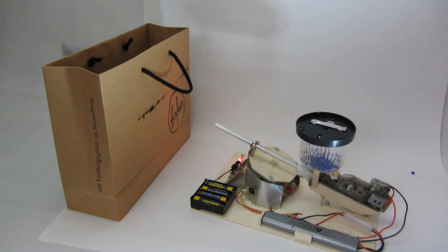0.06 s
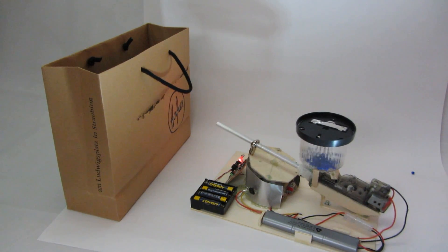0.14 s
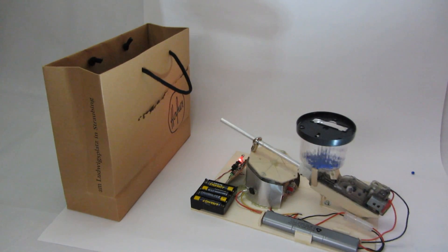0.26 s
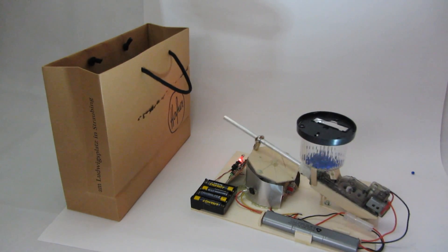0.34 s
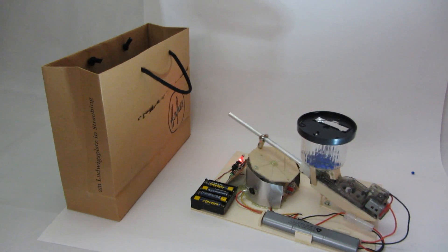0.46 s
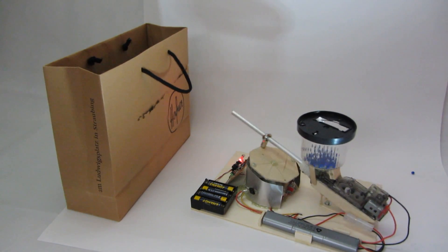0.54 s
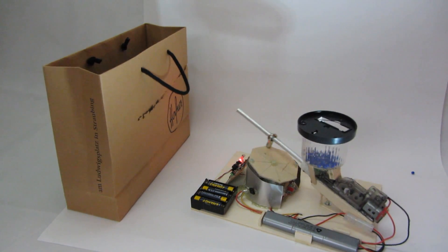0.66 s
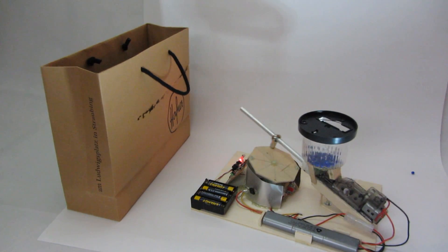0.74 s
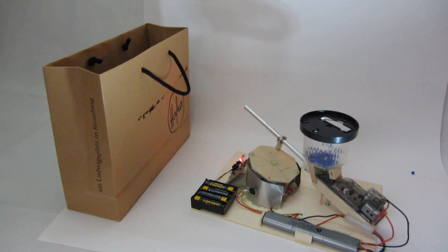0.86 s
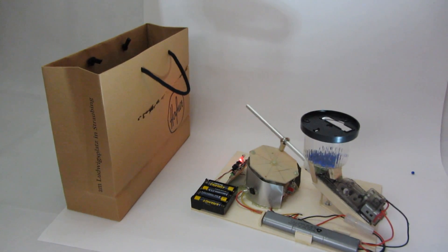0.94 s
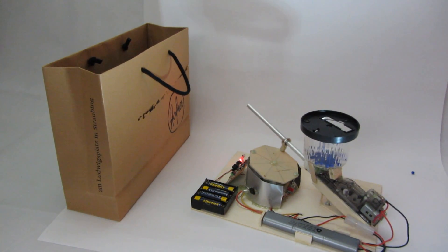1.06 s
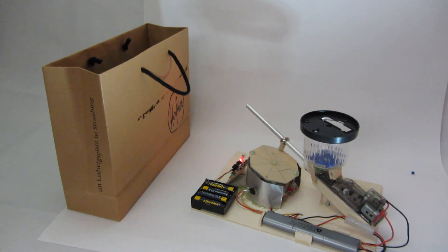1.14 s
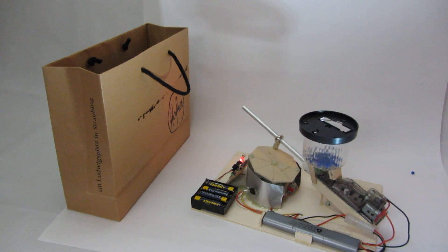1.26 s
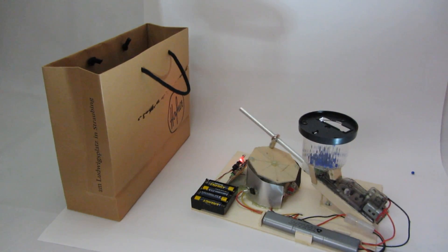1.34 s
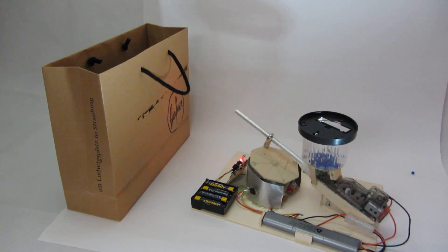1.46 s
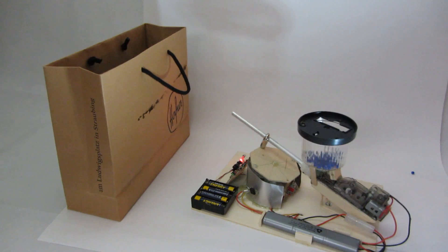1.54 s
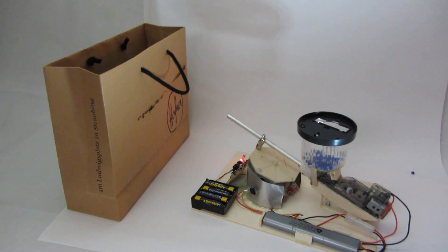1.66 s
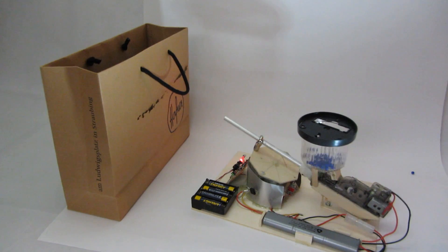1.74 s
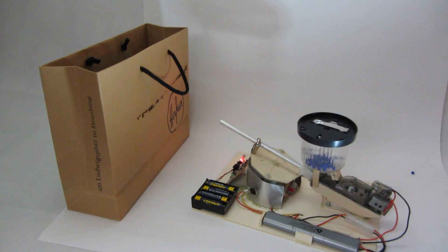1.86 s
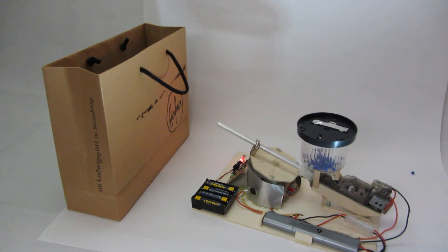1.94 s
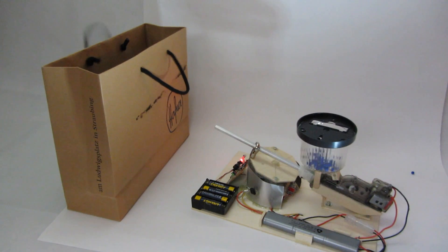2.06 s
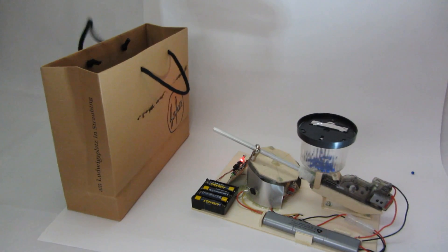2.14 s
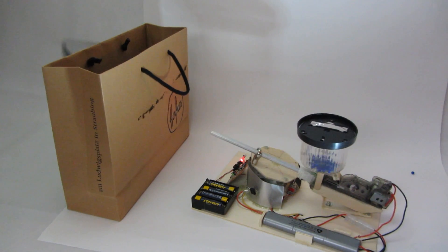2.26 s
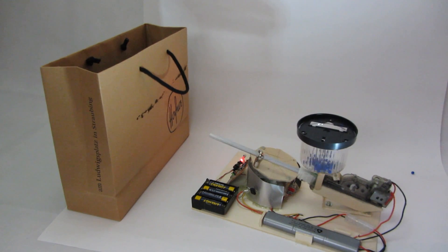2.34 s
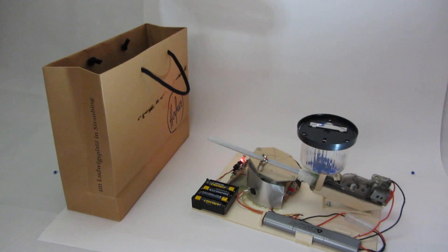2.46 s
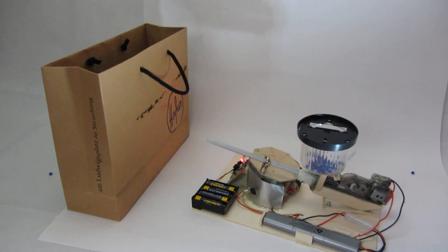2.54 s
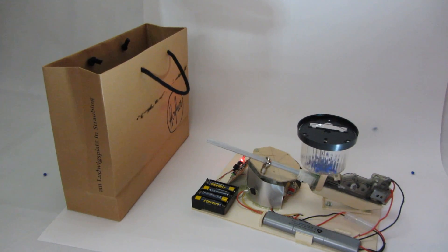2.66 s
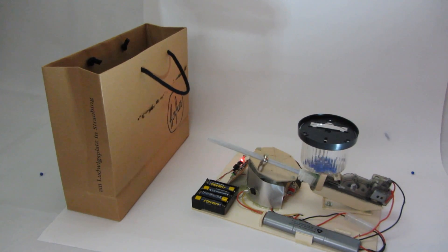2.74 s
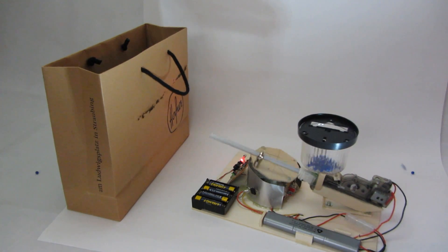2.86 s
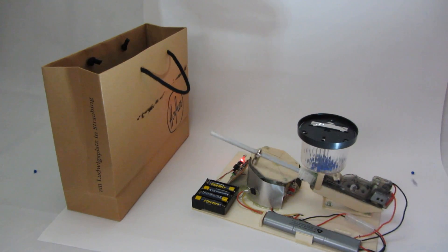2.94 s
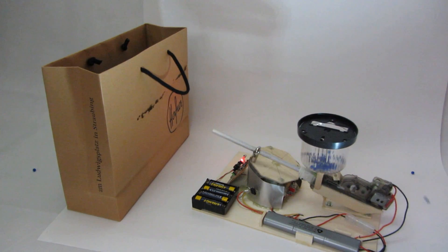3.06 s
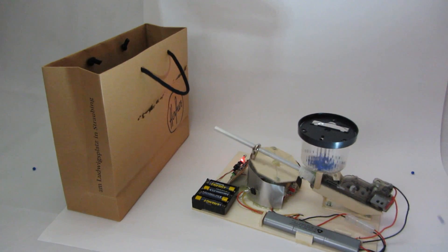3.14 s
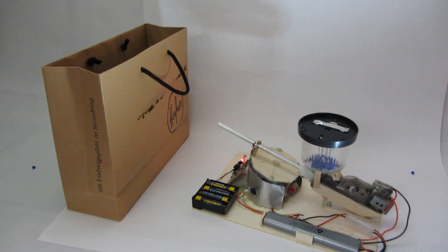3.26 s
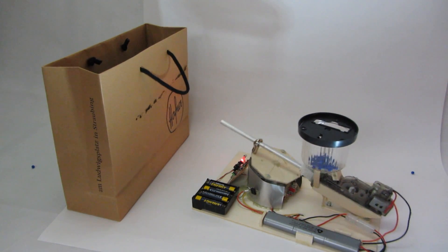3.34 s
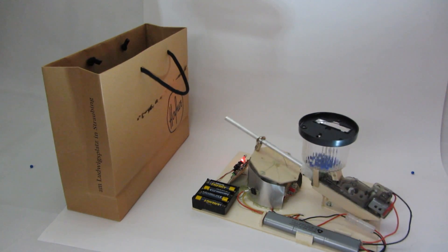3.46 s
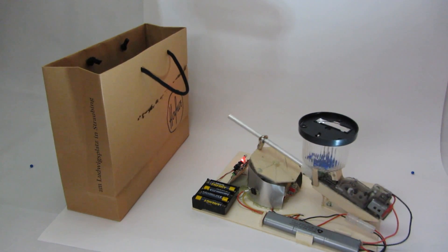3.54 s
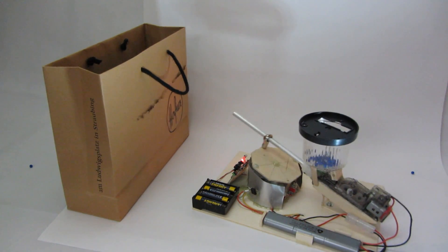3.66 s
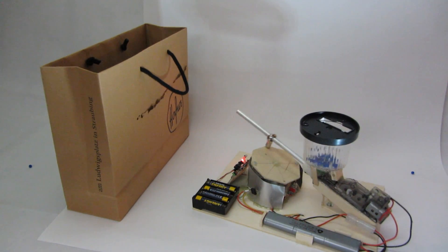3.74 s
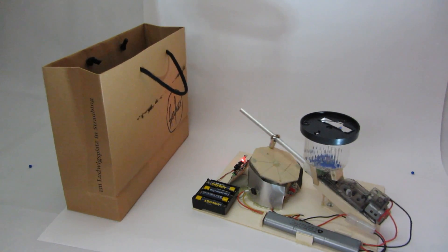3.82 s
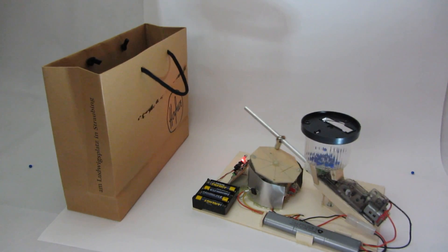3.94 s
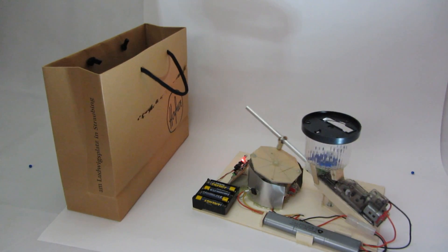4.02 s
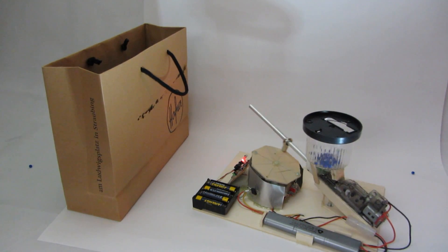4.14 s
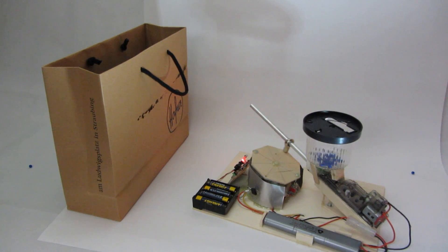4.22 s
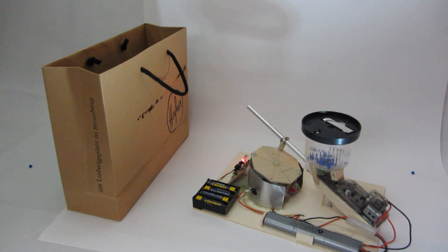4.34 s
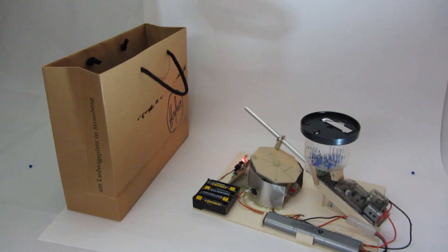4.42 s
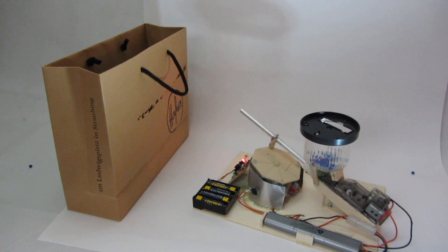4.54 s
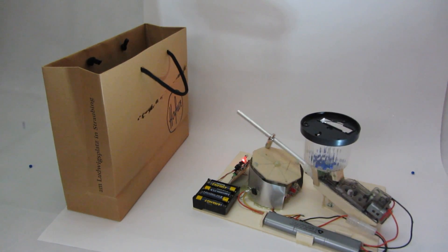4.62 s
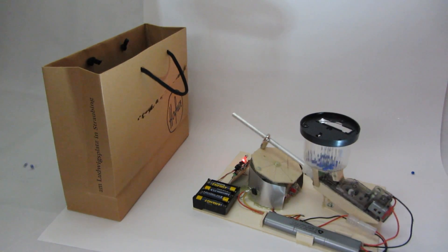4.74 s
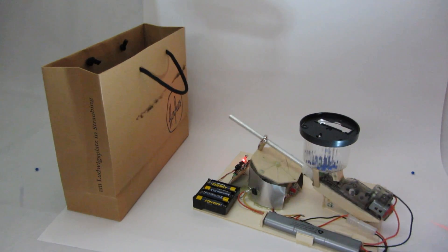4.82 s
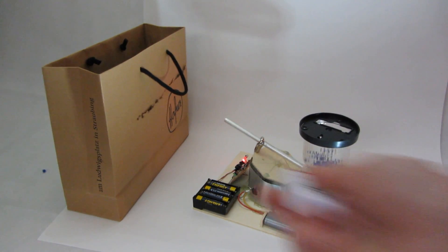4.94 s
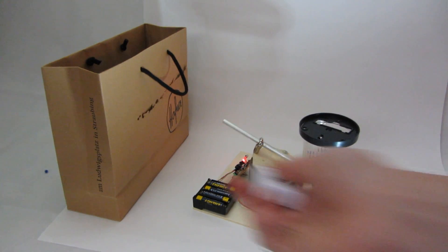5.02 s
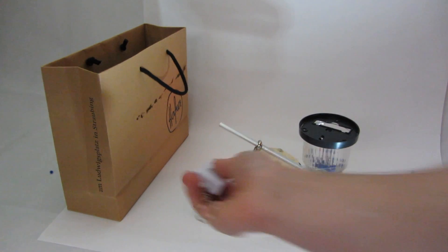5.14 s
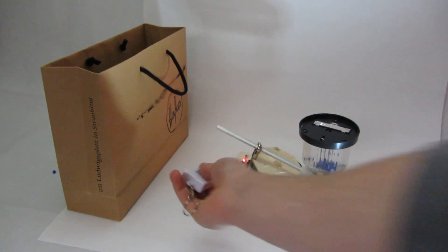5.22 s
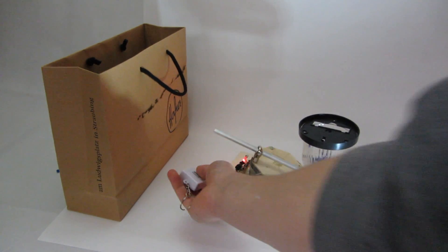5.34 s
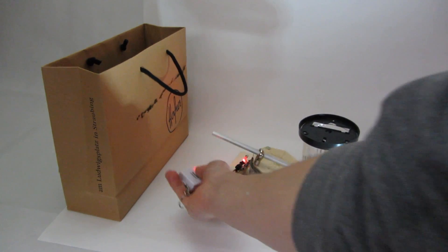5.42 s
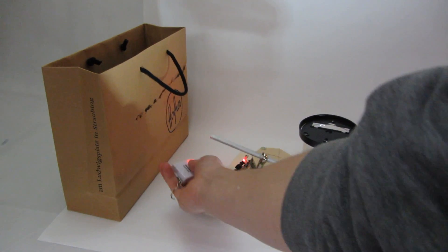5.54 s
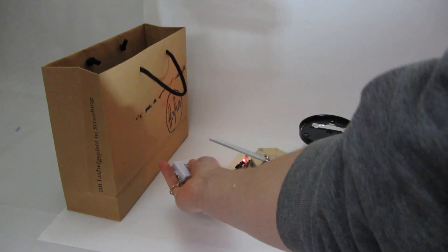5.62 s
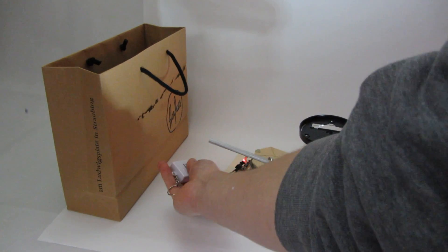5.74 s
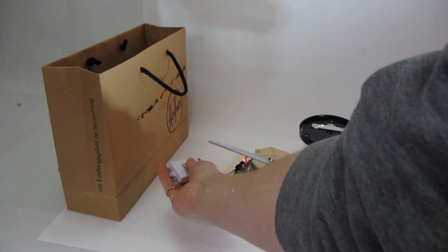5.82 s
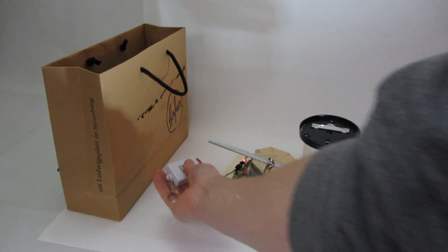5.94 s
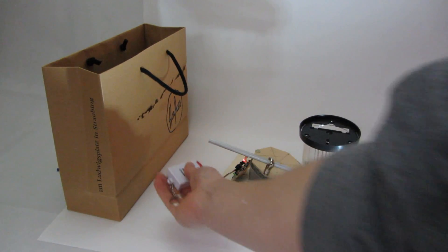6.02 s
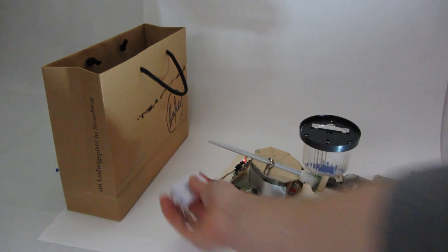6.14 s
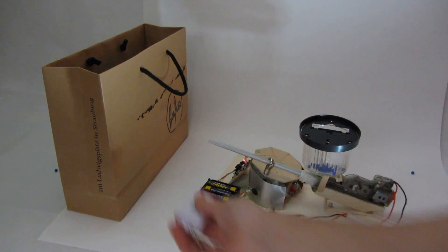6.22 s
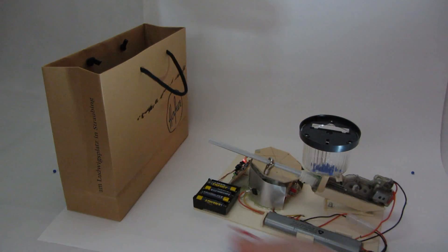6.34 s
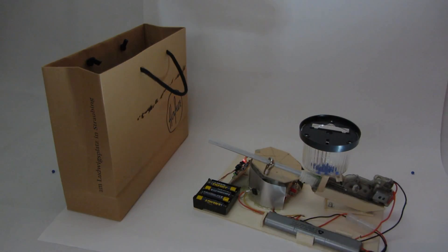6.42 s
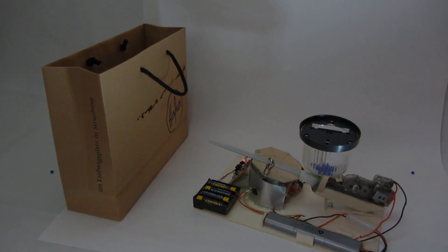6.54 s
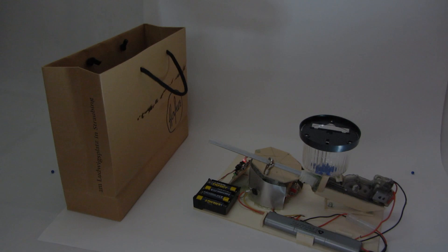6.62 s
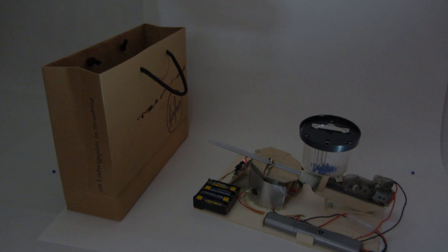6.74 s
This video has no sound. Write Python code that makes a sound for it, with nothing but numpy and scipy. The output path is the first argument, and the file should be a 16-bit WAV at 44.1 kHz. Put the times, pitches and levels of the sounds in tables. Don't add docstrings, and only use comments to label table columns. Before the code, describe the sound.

A small homemade electric pellet gun clatters on automatic at eight hard clacks a second, then stops, leaving ticking plastic pellets and a faint rustle.

```python
import sys
import numpy as np
from scipy import signal
from scipy.io import wavfile

SR = 44100
rng = np.random.default_rng(int(sys.argv[2]) if len(sys.argv) > 2 else 0)


def undo_db(level):
    steps = np.asarray(level, float) / 20
    return 10 ** steps


def file_out(sig):
    cols = np.atleast_2d(sig).T
    lim = np.clip(cols, -1, 1)
    pcm = np.round(lim * 32767).astype(np.int16)
    wavfile.write(sys.argv[1], SR, pcm)


N = 298998
MOTOR_OFF_S, GEARS_STOP_DB_PER_S = 5.723, 162


def in_time(s):
    return np.maximum(np.arange(N) / SR - s, 0)


def clicks(times, db):
    out = np.full(N, 1e-18)
    places = np.round(np.asarray(times) * SR).astype(int)
    np.add.at(out, np.clip(places, 0, N - 1), undo_db(np.asarray(db)))
    return out


def swell(train, rise_s, fall_s):
    rise, fall = np.exp(-1 / (rise_s * SR)), np.exp(-1 / (fall_s * SR))
    return signal.lfilter([1 - rise], np.convolve([1, -rise], [1, -fall]), train)


def grit(spread_db, apart):
    sizes = undo_db(spread_db * np.minimum(rng.exponential(1, N), 5))
    shared, *own = rng.standard_normal((3, N)) * sizes
    out = signal.lfilter([.6, .3], [1], shared) + apart * signal.lfilter([1, -.35], [1], own)
    return out / out.std()


def body(force, modes):
    out, power = 0, 0
    for k, (hz, width_hz, db) in enumerate(modes):
        r = np.exp(-np.pi * width_hz / SR)
        poles = [1, -2 * r * np.cos(2 * np.pi * hz / SR), r * r]
        unit_peak = (1 - r * r) / 2
        out = out + (-1) ** k * undo_db(db) * unit_peak * signal.lfilter([1, 0, -1], poles, force)
        power += undo_db(db) ** 2 * unit_peak
    return out / np.sqrt(power)


def pings(rows, level_db, cycles, rise, spread):
    out = np.zeros((2, N))
    for (s, db, hz), (phase, apart) in zip(rows, rng.uniform(-0.95, 1, (len(rows), 2))):
        turn = np.arange(int(6 * cycles * SR / hz)) * hz / SR
        shape = (1 - np.exp(-turn / rise)) * np.exp(-turn / cycles)
        start = round((s - 1.5 * rise / hz) * SR)
        angle = 2 * np.pi * turn + np.pi * phase + spread * apart * np.array([[1], [-1]])
        out[:, start:start + len(turn)] += undo_db(db + level_db) * shape / shape.max() * np.sin(angle)
    return out


def side_gain(pan_db):
    return undo_db(np.array([[.5], [-.5]]) * pan_db)


def dulled(x):
    return signal.lfilter(*signal.butter(2, 12500, fs=SR), x)


# latch t/s, click
# level/dB, slam level/dB, shudder level/dB
GEAR_TURNS = [(0.001, -6, -12.5, -13.5), (0.1262, -5.5, -8, -16), (0.2506, -7.5, -9, -12.5),
              (0.3758, -6, -8.5, -13), (0.502, -5, -8, -15), (0.627, -7.5, -12, -13),
              (0.7538, -7, -6, -22.5), (0.8783, -6, -7, -19.5), (1.0043, -5.5, -14, -15.5),
              (1.1338, -7, -8.5, -19.5), (1.2609, -7, -9, -20), (1.3864, -7, -6.5, -13),
              (1.5108, -4, -6.5, -17), (1.6345, -6, -15.5, -12), (1.7601, -8, -10.5, -11),
              (1.8872, -7, -7.5, -11.5), (2.0132, -7.5, -18.5, -14.5), (2.1369, -7, -12, -21),
              (2.2638, -8, -8.5, -29), (2.3887, -8.5, -10.5, -27), (2.5122, -8.5, -13, -17),
              (2.6387, -8.5, -9.5, -17.5), (2.762, -7.5, -16.5, -20),
              (2.8835, -8.5, -9.5, -21.5),
              (3.0091, -8, -9.5, -17), (3.1347, -7.5, -8.5, -18), (3.2613, -6.5, -5.5, -14.5),
                           (3.387, -5, -7, -16), (3.514, -6.5, -13.5, -15.5), (3.6416, -5.5, -5.5, -18.5),
                           (3.767, -7, -9, -14.5), (3.8927, -6.5, -6, -14.5), (4.017, -5.5, -8, -15),
                           (4.1424, -5.5, -12, -14), (4.2705, -7, -6.5, -18), (4.3973, -5, -10, -17),
                           (4.522, -5, -8, -18), (4.6472, -5, -11.5, -15), (4.7726, -7, -5.5, -15),
                           (4.8976, -7, -8.5, -24.5), (5.023, -8.5, -9, -16), (5.1502, -8, -10.5, -12.5),
                           (5.275, -8.5, -8, -18), (5.399, -8.5, -12, -19), (5.5243, -9.5, -11.5, -16),
                           (5.6496, -8, -13.5, -16.5)]


def turns():
    return np.transpose(GEAR_TURNS)


# f/Hz, width/Hz, level/dB
SLIP_MODES = [(1400, 300, -9), (2300, 600, -6), (3150, 550, 0), (5500, 1500, -14), (8000, 3000, -17),
              (14000, 4000, -29)]
# f/Hz, width/Hz, level/dB
SLAM_MODES = [(330, 380, -2.5), (900, 210, -4), (1270, 990, -1), (2080, 750, 1), (3006, 280, 3.5),
              (3410, 58, 5.5), (4200, 360, -1), (6080, 1840, -1), (8000, 1800, -0.5), (9350, 5300, -12),
              (14800, 3600, -22)]
# t/s, level/dB
PISTON_SLIPS = [(0.021, -12), (0.1456, -12.5), (0.2713, -16.5), (0.3965, -16.5), (0.5215, -15),
                (0.6487, -9.5), (0.773, -16.5), (0.8986, -14), (1.0235, -14.5), (1.1532, -11),
                (1.2816, -14.5), (1.404, -16.5), (1.53, -11.5), (1.6543, -15), (1.782, -13.5), (1.907, -14),
                (2.0333, -12.5), (2.1576, -12), (2.2843, -12), (2.4094, -13), (2.532, -11.5),
                (2.658, -10.5), (2.7833, -12), (2.904, -14), (3.0293, -14), (3.1566, -13.5),
                (3.2812, -13.5), (3.407, -13.5), (3.5345, -12), (3.661, -16), (3.788, -13), (3.915, -20),
                (4.0384, -14), (4.163, -12.5), (4.289, -15), (4.4175, -12.5), (4.5434, -15), (4.667, -12.5),
                (4.792, -11.5), (4.9179, -13), (5.0444, -12), (5.169, -14.5), (5.2959, -13), (5.4212, -16),
                (5.547, -15), (5.67, -19)]
# t/s, peak level/dB, ring f/Hz
METAL_KNOCKS = [(0.0258, -7, 1830), (0.0285, -11, 2560), (0.1481, -14, 2980),
                (0.1513, -10, 1940), (0.2748, -9, 1800), (0.2803, -23, 2290),
                (0.4001, -14, 1830), (0.4029, -8, 2370), (0.4061, -11, 1960),
                (0.5247, -10.5, 2600), (0.5357, -21, 1920), (0.6509, -20, 4200),
                (0.6567, -14, 2720), (0.6601, -11, 1940), (0.7765, -12, 2560),
                (0.7856, -8.5, 2550), (0.9031, -10, 6300), (0.9057, -20, 2300),
                (1.0283, -14, 3340), (1.0304, -11, 2890), (1.035, -7, 2720),
                (1.1567, -14.5, 2660), (1.1651, -16.5, 1140), (1.2857, -18, 5750),
                (1.2883, -16, 2220), (1.409, -4.5, 2650), (1.4152, -13, 1350),
                (1.4189, -23, 1990), (1.5348, -13, 2700), (1.5372, -9, 3010),
                (1.5401, -6.5, 1660), (1.6579, -6, 2700), (1.6608, -7, 2050),
                (1.6653, -7, 1560), (1.785, -8, 3430), (1.7904, -12, 3390), (1.7954, -15, 2350),
                (1.9115, -12, 2000), (1.915, -8, 2280), (1.9199, -12, 2000), (2.037, -8, 3110),
                (2.04, -6, 2540), (2.0433, -6.5, 2000), (2.1609, -7, 3400), (2.1634, -11, 1660),
                (2.2881, -17, 3350), (2.4124, -8.5, 2100), (2.4148, -22, 3050),
                (2.5344, -5.5, 3400), (2.5368, -9.5, 2000), (2.5451, -19, 2670),
                (2.6618, -9, 1900), (2.6653, -17, 2150), (2.7856, -7.5, 2100),
                (2.7877, -13, 2150), (2.909, -7.5, 2080), (2.9114, -8.5, 3200),
                (3.0327, -17, 2690), (3.0357, -14, 3100), (3.16, -12, 3420),
                             (3.1628, -14, 900), (3.2849, -9, 1890), (3.2878, -17, 2170),
                             (3.2907, -17, 1300), (3.4101, -10.5, 2010), (3.4203, -12, 2990),
                             (3.5384, -5.5, 4980), (3.5412, -13, 3060), (3.665, -8, 4240),
                             (3.672, -13, 2100), (3.7888, -12, 3510), (3.7937, -6, 3270),
                             (3.7978, -7, 1500), (3.915, -12, 3170), (3.9178, -14.5, 3250),
                             (3.92, -23, 3170), (4.0395, -1.5, 4220), (4.043, -12, 3070),
                             (4.048, -18, 1350), (4.1671, -7, 6540), (4.173, -9, 2600), (4.294, -6, 2720),
                             (4.301, -21.5, 1110), (4.4216, -15, 3240), (4.4246, -17, 3260),
                             (4.5476, -24, 2690), (4.555, -6, 2820), (4.6705, -16.5, 1160),
                             (4.7966, -8, 2770), (4.8, -16, 2660), (4.9223, -6, 3450), (4.9292, -15, 3150),
                             (5.0472, -13, 2210), (5.0536, -16, 1270), (5.0557, -9, 2870),
                             (5.1723, -8, 1770), (5.1808, -10.5, 2080), (5.299, -17, 3400),
                             (5.3024, -18, 1800), (5.424, -10, 1970), (5.5489, -8, 2100), (5.551, -8, 2200),
                             (5.6743, -8, 1770), (5.6796, -19, 2960)]


def piston():
    s, _, slam_db, _ = turns()
    slip_s, slip_db = np.transpose(PISTON_SLIPS)
    knocks = METAL_KNOCKS
    knock_s, knock_db = np.transpose(knocks)[:2]
    slip = swell(clicks(slip_s - .003, slip_db + 6.5), 0.0029, 0.003) * grit(1.6, apart=0.6)
    slam_delay_s = 0.0232
    slam = swell(clicks(s + slam_delay_s, slam_db + 0.31), 0.0003, 0.0061) * grit(2.96, apart=1.59)
    signs = np.sign(rng.standard_normal(N) + 0.6 * rng.standard_normal((2, N)))
    bare = clicks(knock_s, knock_db + 12.5) * signs
    parts = body(slip, SLIP_MODES) + body(slam + bare, SLAM_MODES)
    parts += pings(knocks, -2.5, cycles=3.15, rise=.15, spread=0.95)
    return side_gain(-2.4) * parts


# f/Hz, width/Hz, level/dB
BASE_MODES = [(184.5, 50, -8.5), (354, 450, -5.5), (800, 277, 0.5), (1436, 570, 1.5), (2010, 900, 2),
              (2800, 770, 0), (4730, 920, -5), (6870, 2400, -7), (10160, 2500, -14), (14000, 3200, -24)]
# t/s, peak level/dB, ring f/Hz
BASE_THUMPS = [(0.0303, -20, 600), (0.1543, -30, 330), (0.2823, -23, 630), (0.4077, -29, 374),
               (0.5303, -23.5, 776), (0.6577, -15, 980), (0.7886, -27, 360), (0.9121, -37, 304),
               (1.0372, -27, 510), (1.164, -27, 320), (1.2939, -34, 510), (1.4224, -32, 880),
               (1.5397, -25, 605), (1.6692, -26, 900), (1.7927, -19, 640), (1.919, -17, 664),
               (2.044, -26, 580), (2.1652, -37, 337), (2.2896, -23, 795), (2.4164, -29, 580),
               (2.5409, -24.5, 800), (2.6649, -30, 704), (2.7879, -24, 594), (2.912, -20, 594),
               (3.0381, -23, 620), (3.1629, -33, 795), (3.2961, -26, 845), (3.4157, -24, 370),
               (3.5392, -40, 800), (3.6692, -32, 800), (3.8029, -22, 714), (3.9278, -23, 403),
               (4.0423, -22.5, 890), (4.1756, -25, 840), (4.3033, -27, 526), (4.4304, -23, 372),
               (4.5577, -25, 520), (4.6714, -19.5, 820), (4.8051, -36, 290), (4.9246, -30, 610),
               (5.0606, -24.5, 710), (5.1846, -20.5, 706), (5.3044, -24, 537), (5.4263, -29, 393),
               (5.5501, -18, 820), (5.675, -21, 950)]


def wooden_base():
    s, _, _, shudder_db = turns()
    shudder_delay_s = 0.02595
    force = swell(clicks(s + shudder_delay_s, shudder_db + 5.5), 0.001, 0.01) * grit(3.8, apart=1.0)
    thumps = pings(BASE_THUMPS, -1, cycles=2.9, rise=1.246, spread=0.89)
    return side_gain(-1.1) * (body(force, BASE_MODES) + thumps)


# f/Hz, width/Hz, level/dB
LATCH_MODES = [(530, 260, -12), (900, 170, -7.5), (1350, 300, -3), (2000, 490, -6), (2870, 490, -1),
               (3520, 290, -3.5), (4540, 390, -3), (6000, 390, -8), (7160, 900, -8.5), (9800, 4400, -23),
               (13400, 1700, -26.5)]


def latch():
    s, click_db = turns()[:2]
    rebound_db = click_db - 5.5 + 1.8 * rng.standard_normal(len(s))
    tick = clicks(s - .0003, click_db - 6)
    hit = clicks(s + .0005, click_db - 1)
    rebound = clicks(s + .0037, rebound_db - 3)
    sharp = 4.6 * (np.diff(tick, prepend=0) - hit + rebound)
    fresh = swell(tick + hit + rebound, .0002, .0026) * grit(2, apart=1.4)
    lead_in = swell(clicks(s - .002, click_db - 16), .0005, .002) * grit(2, apart=.5)
    click = body(sharp + .46 * fresh + lead_in, LATCH_MODES)
    lows = signal.lfilter(*signal.butter(2, 3700, fs=SR), click)
    treble_lost_per_db = 1.3
    click_now_db = np.interp(in_time(0), s, click_db)
    treble_db = np.minimum(treble_lost_per_db * (click_now_db + 7.0), 0)
    return side_gain(-4.5) * (lows + undo_db(treble_db) * (click - lows))


# t/s, level/dB, left-right level/dB
STRONG_PUFFS = [(0.027, -17, -9), (0.157, -27, -6), (0.531, -18, -1), (0.657, -17.5, -2.5),
                (0.907, -18, -7.5), (1.4169, -10, -6.5), (1.6614, -10, -9.5), (1.788, -17.5, -8),
                (1.917, -22, -4), (2.1674, -9.5, -10.5), (2.292, -11, -2), (3.036, -22, 2),
                (3.163, -19, -6), (3.29, -17, -2.5), (3.4164, -11.5, 22), (3.67, -16, 2.5),
                (3.796, -23, -10), (3.9208, -13.5, 2), (3.969, -25, 3), (4.169, -23, -1.5),
                (4.674, -21, -1.5), (4.802, -10, 1), (4.929, -14.5, -4.5), (5.052, -17, -14),
                (5.179, -8, -11), (5.304, -13.5, -5.5), (5.5519, -24, -6)]


def air_puffs():
    faint = [(s + 0.03, -30.5, 5 * rng.standard_normal()) for s in turns()[0]]
    s, puff_db, side_db = np.transpose(STRONG_PUFFS + faint)
    port_db = puff_db + side_db * np.array([[.5], [-.5]]) - 0.28 * np.abs(side_db)
    train = np.array([clicks(s - .0015, db + 5.5) for db in port_db])
    train += clicks(turns()[0], -36)
    push = swell(train, 0.00054, 0.0011)
    pull = 0.72 * signal.lfilter([.012], [1, -.988], push)
    wave = 2.02 * (push - pull)
    turbulence = body(rng.standard_normal((2, N)), [(82, 69, -3.0), (290, 350, -7.0)])
    lumpy = swell(train, 0.00033, 0.0042) * turbulence
    return wave * [[-1], [1]] + 0.18 * lumpy


# f/Hz, width/Hz, level/dB
BAG_WALL_MODES = [(510, 180, 0.5), (1210, 870, 1.8), (2100, 1100, 4.5), (3400, 640, 1.5)]
# f/Hz, width/Hz, level/dB
PAPER_MODES = [(5200, 1700, 10), (7900, 1800, 9), (10300, 810, 4), (14000, 2100, -8.5)]
# t/s, level/dB, brightness level/dB
BAG_STRIKES = [(0.064, -17, -2), (0.319, -26.5, 1.5), (0.447, -18, 0.5), (0.695, -20, -17),
               (0.953, -23.5, 4), (1.205, -19, -1), (1.33, -23, 5.5), (1.579, -25, -13), (2.201, -31, 4),
               (2.333, -17, -3), (2.449, -21, 1), (2.562, -13.5, -5), (2.7, -21.5, -0.5), (2.819, -14, 3),
               (2.946, -20, -1), (3.082, -24.5, 7), (3.195, -22, 2.5), (3.328, -17.5, -0.5),
               (3.968, -17, 1), (4.083, -14.5, 0), (4.216, -20, -1), (4.342, -16, -3), (4.466, -26, 9),
               (5.472, -19.5, -2), (5.59, -21, 1)]
# t/s, level/dB, brightness level/dB, left-right level/dB
PELLET_BOUNCES = [(0.987, -29, -3, -9), (1.087, -24.5, 4, 2), (1.501, -20, -3.5, 4), (1.725, -30, -17, -7),
                  (2.508, -25, 3.5, -3), (2.574, -18, -2, 2), (3.073, -21.5, -1, -3), (3.108, -19, -3, 0),
                  (3.121, -23, -10, 16), (3.863, -23, -25, 1), (4.128, -15, -6, 8), (4.855, -29, 1, -2),
                  (5.199, -18, -22, 1), (5.247, -25, -21, -4), (5.359, -28, 2, 5)]


def pellets():
    bag_side_db = 1.5
    hits = [(*row, bag_side_db) for row in BAG_STRIKES] + PELLET_BOUNCES
    s, db, bright_db, pan_db = np.transpose(hits)

    def push(level_db, fall_s):
        return np.array([swell(clicks(s, level_db + sign * pan_db / 2), .0006, fall_s) for sign in (1, -1)])

    knock = push(db + 2.5, .005) * grit(0.98, apart=1.0)
    crack = push(db + bright_db, .007) * grit(1.6, apart=1.0)
    return body(knock, BAG_WALL_MODES) + body(crack, PAPER_MODES)


# t/s, level/dB, ring f/Hz, brightness level/dB
STRAY_PELLETS = [(5.892, -35.5, 600, -14), (6.005, -37, 500, -19), (6.031, -37, 1500, 4),
                 (6.135, -34.5, 2740, 8), (6.197, -44, 1460, -18), (6.219, -43, 8300, 17),
                 (6.254, -34.5, 5460, 7), (6.275, -51, 11000, 14), (6.302, -40.5, 2120, 3),
                 (6.375, -40, 1360, -6), (6.422, -41.5, 6050, 7), (6.448, -46, 5600, 3),
                 (6.481, -44, 2920, 5), (6.523, -43, 1500, -10), (6.533, -44, 880, -3),
                 (6.585, -38, 2150, -5), (6.601, -60, 11500, 16), (6.652, -41, 635, -17),
                 (6.685, -44.5, 575, -1), (6.739, -45, 1650, -6)]


def strays():
    out, contact = np.zeros((2, N)), grit(1.9, apart=1.0)
    for s, db, hz, bright_db in STRAY_PELLETS:
        fall_s = max(0.013 + 0.0003 * bright_db, .004)
        start = round(s * SR)
        span = slice(start, start + SR // 8)
        t = np.arange(contact[:, span].shape[1]) / SR
        rattle, crack = 0.7 * np.exp(-t / fall_s), 1.1 * np.exp(-t / 0.002)
        force = contact[:, span] * (rattle + crack)
        modes = [(hz, 0.059 * hz, 3 - hz / 1000), (1100, 700, -9), (2000, 1600, -9),
                 (6800, 4200, bright_db - 13.5)]
        out[:, span] += undo_db(db - 5.0) * side_gain(1.5) * body(force, modes)
    return dulled(out)


# t/s, level/dB, ring f/Hz
HOLLOW_LANDINGS = [
    (6.033, -47, 850),
    (6.047, -51, 470),
    (6.143, -41, 1370),
]


def hollow_part():
    return pings(HOLLOW_LANDINGS, 0, cycles=9.8, rise=1.0, spread=.6)


# f/Hz, width/Hz, level/dB
GEAR_MODES = [(160, 73, -6), (360.6, 38, 2), (543, 78, 0.5), (820, 125, 5), (1350, 1050, -0.5),
              (2450, 690, 1.5), (3090, 420, 4), (4300, 1270, -2), (6050, 1250, -2.5), (8250, 1840, -8),
              (15100, 5700, -25)]


def gears():
    level_db = -27 - GEARS_STOP_DB_PER_S * in_time(MOTOR_OFF_S)
    load = 0.72 + swell(clicks(turns()[0, :-1] + 0.059, 0), 0.0011, 0.0077)
    lumps_per_s, lump_db = 70, 2.5
    lumps = np.interp(in_time(0) * lumps_per_s, np.arange(1000), rng.standard_normal(1000))
    grind = body(grit(3.05, apart=1.0), GEAR_MODES)
    return side_gain(-2.5) * undo_db(level_db + lump_db * lumps) * load * grind


# f/Hz, width/Hz, level/dB
JAR_MODES = [(3270, 76, 2), (3510, 110, -1.5), (4530, 92, -7), (5750, 270, -9), (6520, 100, 0),
             (8300, 3200, -16.5)]
# f/Hz, width/Hz, level/dB
JAR_HIT_MODES = [(3240, 150, -2), (3500, 130, -4.5), (4530, 60, -11), (5750, 150, -12), (6520, 40, 4),
                 (8300, 3300, -14.5)]
# t/s, level/dB
COASTING_TICKS = [(5.759, -21), (5.785, -26), (5.8102, -19), (5.8214, -28), (5.8617, -20), (5.871, -13),
                  (5.878, -20), (5.925, -19), (5.9463, -19), (5.9663, -26), (5.988, -21), (5.9964, -23),
                  (6.0307, -32), (6.055, -33)]


def feed_jar():
    full_db = -37.5 - 0.3 * in_time(0) - GEARS_STOP_DB_PER_S * in_time(MOTOR_OFF_S)
    coast_db = -51 - 130 * in_time(6.02)
    shaken = swell(rng.random(N) < 60 / SR, 0.00048, 0.009)
    impacts = rng.random(N) < (200 + 1200 * shaken) / SR
    rattle = undo_db(np.maximum(full_db, coast_db)) * impacts * grit(1.9, apart=1.0) * 7
    tick_s, tick_db = np.transpose(COASTING_TICKS)
    ticks = swell(clicks(tick_s, tick_db - 14), .0003, 0.0035) * grit(2.2, apart=0.67)
    return side_gain(-2.5) * (body(rattle, JAR_MODES) + dulled(body(ticks, JAR_HIT_MODES)))


def room(x):
    t60_s, level_db, wall_cut_hz = 0.18, -11, 5600
    t = np.arange(SR // 2) / SR
    shared, *own = rng.standard_normal((3, len(t)))
    field = shared + 1.73 * signal.lfilter([1, -.93], [1], own)
    field = signal.lfilter(*signal.butter(1, wall_cut_hz, fs=SR), field)
    field = field * undo_db(-60 * t / t60_s) * (t > .004)
    field = field / np.sqrt(np.sum(field ** 2) / 2)
    return undo_db(level_db) * signal.oaconvolve(x.mean(axis=0)[None], field)[:, :N]


# f/Hz, width/Hz, level/dB
AIR_MODES = [(60, 42, -24), (152, 180, -1), (463, 740, -1.5), (1500, 1400, -2.5), (2600, 2300, -5)]
# f/Hz, width/Hz, level/dB
RUSTLE_MODES = [(4930, 1600, 0.19), (7500, 5700, -2.2)]
# t/s, level/dB
SLEEVE_RUSTLES = [
    (6.025, -46),
    (6.14, -55),
    (6.26, -57),
    (6.51, -61),
    (6.59, -72),
]


def murmur():
    stirred = undo_db(-40 - 120 * in_time(MOTOR_OFF_S))
    quiet = undo_db(-57.5) + 2 * swell(clicks(*np.transpose(SLEEVE_RUSTLES)), 0.013, 0.027)
    hiss = quiet * undo_db(-5.5 - 51 * in_time(6.43))
    air = (stirred + quiet) * body(grit(2.7, apart=1.0), AIR_MODES)
    air = air + hiss * body(grit(2.5, apart=0.7), RUSTLE_MODES)
    return signal.sosfilt(signal.butter(3, 8000, fs=SR, output="sos"), air)


def self_noise():
    return undo_db(-81) * np.diff(rng.standard_normal((2, N)), prepend=0)


def scene():
    near = piston() + wooden_base() + latch() + pellets() + strays() + gears() + feed_jar()
    left_lag = 2
    near[0] = signal.lfilter([1.06, -.14], [1], np.roll(near[0], left_lag))
    return near + room(near) + air_puffs() + hollow_part() + murmur() + self_noise()


def band_limit(x):
    return signal.sosfilt(signal.butter(12, 16850, fs=SR, output="sos"), x)


def record(dry):
    peak = 0.89
    rounded = peak * np.tanh(dry / peak)
    bass_cut = signal.butter(2, 55, "high", fs=SR, output="sos")
    top_cut = signal.cheby2(14, 50, 16300, fs=SR, output="sos")
    return band_limit(signal.sosfilt(np.vstack([bass_cut, top_cut]), rounded))


dry = scene()
out = record(dry)
file_out(out)
```